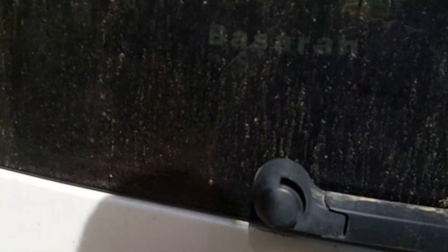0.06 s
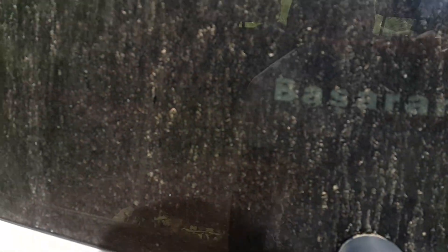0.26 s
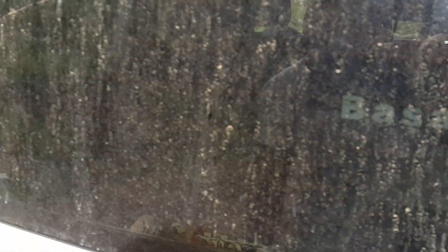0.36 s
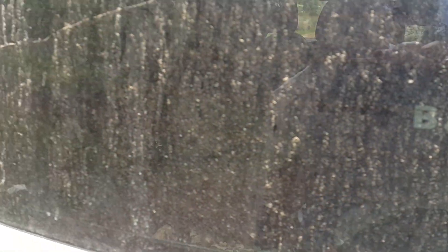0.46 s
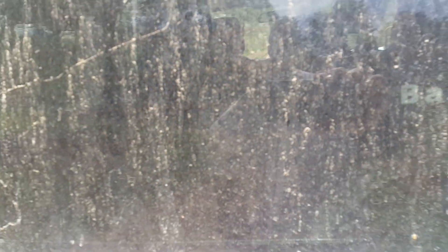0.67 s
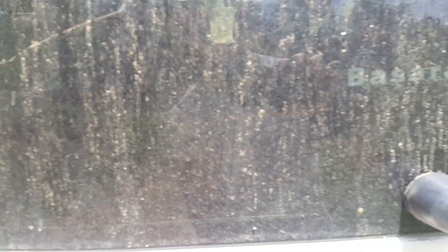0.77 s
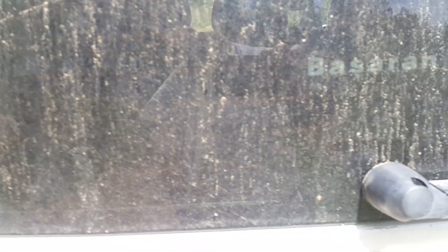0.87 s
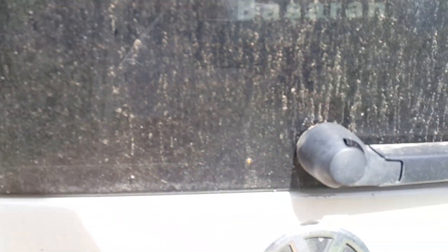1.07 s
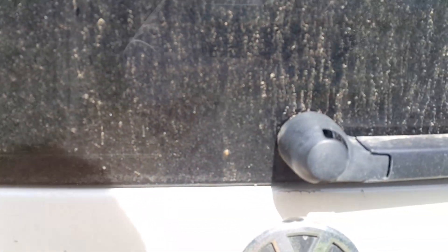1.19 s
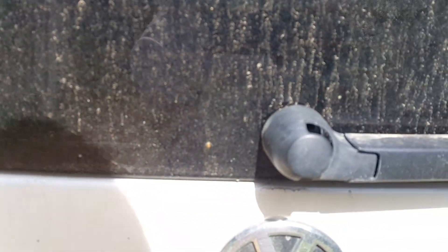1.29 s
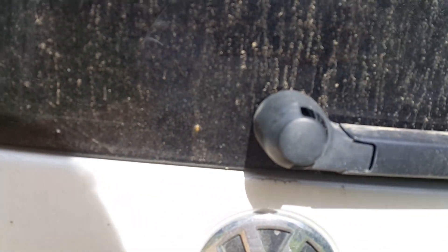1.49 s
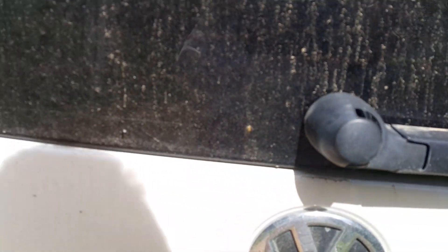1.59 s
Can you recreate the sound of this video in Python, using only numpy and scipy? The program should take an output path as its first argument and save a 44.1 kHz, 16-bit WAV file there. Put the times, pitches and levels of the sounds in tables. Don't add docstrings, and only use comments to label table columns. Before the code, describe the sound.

A van tailgate is pushed down outdoors, heard close up. A faint touch at 0.04 seconds, then a heavy hollow thud with rapid bounces and trim rattle from 0.23 to 0.45. A lighter knock and dry hand rub follow around 0.6-0.75, wind thumps at 0.9-1.05, a scraping metallic latch snap at 1.3, then rubber creaks, a soft rub and tiny distant bird whistles over faint traffic.

```python
import sys
import numpy as np
from scipy import signal
from scipy.fft import rfft, irfft
from scipy.io import wavfile
from scipy.ndimage import uniform_filter1d

SR = 44100
rng = np.random.default_rng(int(sys.argv[2]) if len(sys.argv) > 2 else 0)


def dump(signal):
    limited = np.clip(np.atleast_2d(signal).T, -1, 1)
    pcm = np.round(limited * 32767).astype(np.int16)
    wavfile.write(sys.argv[1], SR, pcm)


def undo_db(level):
    steps = np.asarray(level, float) / 20
    return 10 ** steps


N = 72765

# (frequency [Hz], level [dB])
RIGHT_FACING = [(300, -2), (1000, 2), (2400, 2), (5500, 7), (9000, -5)]
CLIP_RIGHT_DB = 7.5


def evened(x):
    return x / np.sqrt(np.mean(x ** 2) + 1e-20)


def read(points, hz):
    f, value = np.transpose(points)
    return np.interp(np.log(hz + 1), np.log(f + 1), value)


def colour(x, points):
    gain = undo_db(read(points, np.fft.rfftfreq(x.shape[-1], 1 / SR)))
    return irfft(rfft(x) * gain, x.shape[-1])


def add(mix, s, sound):
    part = mix[..., max(round(s * SR), 0):][..., :sound.shape[-1]]
    part += sound[..., :part.shape[-1]]


def ring(x, modes):
    out = np.zeros(x.shape)
    for k, (hz, width_hz, db) in enumerate(modes):
        r = np.exp(-np.pi * width_hz / SR)
        poles = [1, -2 * r * np.cos(2 * np.pi * hz / SR), r * r]
        out += (-1) ** k * undo_db(db) * signal.lfilter([1 - r, 0, r - 1], poles, x)
    return out


def street():
    # (frequency [Hz], density [dB per Hz])
    wash_spectrum = [(24, 10.5), (40, 21), (237, 5.5), (715, 4), (852, 0), (3800, -13), (5400, -12.5),
                     (7500, -18), (16000, -16.5)]
    # (frequency [Hz], likeness [0-1])
    likeness = [(100, 1), (500, 0.61), (1500, 0)]
    level_db, patch_db = -54.5, 2
    frames, hz = N // 128 + 5, np.fft.rfftfreq(512, 1 / SR)
    a, b, c, d, patches = rng.standard_normal((frames, 257, 5)).T
    patches = uniform_filter1d(patches, 8, 0)
    patches = evened(uniform_filter1d(patches, 20, 1))
    same = np.clip(read(likeness, hz), -1, 1)[:, None]
    left = a + 1j * b
    right = same * left + np.sqrt(1 - same ** 2) * (c + 1j * d)
    z = np.array([left, right]) * undo_db(read(wash_spectrum, hz)[:, None] + patch_db * patches)
    wash = signal.istft(z, nperseg=512, noverlap=384)[1][:, :N]
    return undo_db(level_db) * evened(np.array([wash[0], colour(wash[1], RIGHT_FACING)]))


def bird():
    # (time [s], length [s], level [dB], pitch [Hz], left over right [dB])
    whistles = [
        (1.363, .055, -65, 4400, -14),
        (1.585, .05, -65, 4480, 6),
    ]
    out = np.zeros((2, N))
    for s, length_s, db, hz, pan_db in whistles:
        t = np.arange(0, length_s, 1 / SR)
        pitch_hz = hz * (1 - 0.123 * np.exp(-t / 0.0049) - 0.14 * t)
        tone = np.sin(2 * np.pi * np.cumsum(pitch_hz) / SR) * np.sin(np.pi * t / length_s) ** .5
        add(out, s, undo_db(db + pan_db * np.array([[.5], [-.5]])) * tone)
    return out


def wind():
    # (time [s], level [dB])
    gust = [(0, -46), (.08, -32), (.17, -30), (.25, -52), (.55, -49), (.8, -56), (.9, -25.5), (.95, -24.5),
            (.98, -35.5), (1.02, -30), (1.17, -39.5), (1.22, -45), (1.35, -52.5), (1.52, -59), (1.65, -59)]
    # (time [s], level [dB], frequency [Hz], negative = inverted)
    thumps = [(0.145, -22, 190), (0.151, -20.5, 149), (0.868, -24, 118), (0.902, -17.5, 121),
              (0.937, -28, 125.5), (0.998, -23.5, 293), (1.008, -18.5, 160), (1.023, -26, 257),
              (1.032, -23, 205.5), (1.038, -14, -230), (1.049, -20.5, 120), (1.141, -23, 156)]
    # (frequency [Hz], density [dB per Hz])
    turbulence = [(25, -36), (55, 10.5), (100, 18), (200, 4), (350, -6), (700, -47)]
    left_db, lump_db, thump_turns = -56, 3, 0.39
    t = np.arange(N) / SR
    lumps = undo_db(lump_db * evened(uniform_filter1d(rng.standard_normal((2, N)), 700)))
    out = evened(colour(rng.standard_normal((2, N)) * lumps, turbulence))
    out *= undo_db([left_db + 6 * np.exp(-t / 0.69), np.interp(t, *np.transpose(gust))])
    for s, db, hz in thumps:
        turns = np.arange(-1000, 1000) / SR * hz
        thump = np.sin(2 * np.pi * turns) * np.exp(-(turns / thump_turns) ** 2)
        add(out[1], s - 1000 / SR, undo_db(db + 4.5) * thump)
    return out


def seal_creep():
    # (time [s], resonance [Hz], level [dB])
    creep_path = [(1.35, 1256, -65), (1.375, 1370, -65.5), (1.41, 1430, -66.5), (1.43, 1300, -66),
                  (1.445, 1330, -57), (1.49, 1490, -53.5), (1.526, 1420, -58.5), (1.566, 1400, -52),
                  (1.612, 1480, -62.5), (1.65, 1500, -62)]
    width_hz, slips_per_s, size_db = 290, 3500, 1
    s, hz, db = np.transpose(creep_path)
    t = np.arange(N) / SR
    sizes = undo_db(size_db * np.minimum(rng.exponential(1, N), 4))
    slips = sizes * (rng.random(N) < slips_per_s / SR)
    clicks = slips * rng.standard_normal(N) + 0.11 * rng.standard_normal((2, N))
    turn = np.exp(2j * np.pi * np.cumsum(np.interp(t, s, hz)) / SR)
    r = np.exp(-np.pi * width_hz / SR)
    rung = (turn * signal.lfilter([1], [1, -2 * r, r * r], clicks / turn)).real
    return evened(rung) * undo_db(np.interp(t, s, db, left=-120) + CLIP_RIGHT_DB * np.array([[-.5], [.5]]))


def rubs():
    # (time [s], length [s], hiss level [dB], rumble over hiss [dB])
    strokes = [
        (0.1977, 0.21, -48.5, 18),
        (0.41, 0.23, -84.5, 41.5),
        (0.642, 0.14, -48, -4.5),
        (0.061, 0.056, -53, 11),
        (1.4726, 0.18, -48.5, 6),
    ]
    # (frequency [Hz], density [dB per Hz])
    skin_hiss = [(290, -45), (500, -6), (1100, -3), (3800, -12.5), (5300, -11.5), (7500, -30), (11000, -23),
                 (16000, -37)]
    rumble_hz, grain_db = 300, 2.5
    hiss = rng.standard_normal((2, N)) + 0.13 * rng.standard_normal(N)
    hiss = evened(colour(hiss, [(200, 4.1)] + list(skin_hiss)))
    rumble = rng.standard_normal(N) + 0.18 * rng.standard_normal((2, N))
    rumble = ring(rumble, [(rumble_hz, 160, 0), (150, 110, -1)])
    rumble = evened(colour(rumble, [(900, 0), (2500, -25)]))
    clumps = undo_db(grain_db * evened(uniform_filter1d(rng.standard_normal(N), 150)))
    hiss_gain, rumble_gain = np.zeros((2, N))
    for s, length_s, db, rumble_db in strokes:
        arch = np.sin(np.pi * np.arange(0, 1, 1 / (length_s * SR)) ** 0.8)
        add(hiss_gain, s, undo_db(db) * arch)
        add(rumble_gain, s, undo_db(db + rumble_db) * arch)
    return clumps * (hiss_gain * hiss * undo_db([[-1.5], [1.5]]) + rumble_gain * rumble)


def clip_ticks():
    # (time [s], level [dB], pitch [Hz], time to fall 85 dB [s])
    clip_hits = [(.2555, -8.5, 1767, 0.033), (.2572, -6, 1130, 0.012), (.3145, -14.5, 1857, 0.038),
                 (.335, -24.5, 1020, 0.036), (.343, -17, 1570, .03), (.396, -24.5, 1116, 0.045),
                 (.411, -33, 890, 0.055), (.429, -31.5, 946, 0.056), (.439, -38, 1490, 0.027),
                 (.459, -33.5, 1140, 0.066), (.466, -38, 1280, 0.052), (.476, -39, 2000, .025),
                 (.486, -38, 1050, 0.037), (.499, -38, 1150, 0.026), (.536, -35, 1040, 0.046),
                 (.547, -41, 1000, 0.044), (.561, -38.5, 1110, 0.053), (.588, -45, 1060, .04),
                 (.609, -33.5, 1024, 0.14), (0.649, -34.5, 303, 0.31), (0.675, -29, 1600, 0.038),
                 (.711, -42, 664, 0.077), (1.007, -38, 1610, 0.035), (1.209, -46, 1320, 0.021),
                 (1.259, -41, 1080, 0.036), (1.307, -33, 710, 0.032), (1.3508, -28, 496, 0.013),
                 (1.374, -53, 450, .02), (1.473, -42, 1370, 0.036), (1.5, -28, 1380, 0.025),
                 (1.538, -43, 920, 0.044), (1.589, -39, 790, 0.051)]
    rise_s, spread, rough_db, left_lag_s = 0.0008, 0.21, 2, 0.00026
    out, t = np.zeros((2, N)), np.arange(3000) / SR
    draws = rng.uniform(-1.08, 1, (len(clip_hits), 2, 2, 1))
    for (s, db, hz, t60), (apart, turn) in zip(clip_hits, draws):
        near_hz = hz * (1 + spread * (apart + [[-1], [1.5]]) / 2)
        near = np.sin(2 * np.pi * near_hz * t + np.pi * turn).sum(0)
        shake = undo_db(rough_db * evened(uniform_filter1d(rng.standard_normal(len(t)), 60)))
        envelope = undo_db(db - 1.5 - 85 * t / t60) * np.minimum(t / rise_s, 1) * shake
        note = envelope * (np.sin(2 * np.pi * hz * t) + 0.59 * near)
        add(out[0], s + left_lag_s, undo_db(-CLIP_RIGHT_DB / 2) * note)
        add(out[1], s, undo_db(CLIP_RIGHT_DB / 2) * note)
    return out


def latch():
    # (time [s], level [dB])
    striker_slips = [(1.2908, -24), (1.2952, -22), (1.2978, -23), (1.3012, -24), (1.3034, -20),
                     (1.306, -21), (1.3085, -22), (1.3115, -31), (1.316, -38)]
    # (time [s], level [dB])
    claw_snaps = [
        (1.2968, -13),
        (1.308, -6.5),
    ]
    # (frequency [Hz], width [Hz], level [dB])
    latch_modes = [(2520, 210, -10), (3500, 390, -9.5), (5090, 730, -2.5), (6600, 1400, -5),
                   (10400, 1300, -13.5), (15000, 2900, -20)]
    # (frequency [Hz], level [dB])
    latch_gaps = [(900, -8), (1750, -11), (2300, 0), (3600, 0), (4050, -8), (4700, -1), (15800, 0),
                  (16800, -40)]
    # (frequency [Hz], level [dB])
    right_shade = [(2000, 0.5), (5500, -0.5), (8000, -9.5), (16000, -3.5)]
    grind_db, slip_t60_s, right_lag_s, right_db = 19, 0.011, 0.00066, 5
    spring_s, spring_hz, spring_db = 1.3135, 830, -31
    grind, snap, t = np.zeros(N), np.zeros(N), np.arange(900) / SR
    for s, db in striker_slips:
        envelope = undo_db(grind_db + db - 60 * t / slip_t60_s) * np.minimum(t / 0.00077, 1)
        add(grind, s, envelope * rng.standard_normal(len(t)))
    for s, db in claw_snaps:
        add(snap, s, undo_db(db) * np.diff(np.exp(-((t - .0002) / .00004) ** 2)))
    twice_rung = ring(ring(grind + 6.5 * snap, latch_modes), latch_modes)
    left = twice_rung + 1.02 * ring(grind, latch_modes)
    left = colour(left + 2 * snap, latch_gaps)
    envelope = undo_db(spring_db - 60 * t / .05) * np.sin(np.pi * t / t[-1]) ** .5
    add(left, spring_s, envelope * np.sin(2 * np.pi * spring_hz * t))
    right = colour(np.roll(left, round(right_lag_s * SR)), right_shade)
    return np.array([left, undo_db(right_db) * right])


def trim_knocks():
    # (time [s], level [dB], brightness [dB], t60 [s])
    trim_hits = [(0.037, -38, 3.5, 0.12), (0.2291, -13.5, 2.5, 0.04), (0.234, -22.5, 3.5, 0.13),
                 (.254, -16.5, 4.5, 0.13), (.2565, -9.5, 8, 0.011), (0.285, -28.5, 4.5, 0.072),
                 (0.304, -29.5, 8.5, 0.13), (0.314, -19, 6.5, 0.13), (.332, -24, 6, 0.19),
                 (0.342, -20, -5.5, 0.25), (.348, -30, 3, 0.05), (0.395, -26.5, 3, 0.047),
                 (0.409, -36.5, 3.5, 0.035), (0.604, -32, 5.5, 0.15), (0.674, -38.5, -6, 0.1),
                 (0.718, -45, 8.5, 0.042), (0.766, -59, 26.5, 0.029), (0.9, -44.5, 2, 0.092),
                 (1.007, -49, -0.5, 0.18), (1.03, -32, 5, 0.035), (1.043, -58, 25.5, 0.067),
                 (1.2559, -49, 13, 0.052), (1.265, -50.5, 13, 0.059), (1.351, -40, 0, 0.014),
                 (1.374, -47, 9, 0.015), (1.499, -50, 3, 0.025)]
    # (frequency [Hz], width [Hz], level [dB])
    trim_modes = [(510, 109, 3), (877, 176, 4), (1073, 276, 1.5), (1320, 214, 1), (1637, 340, -3.5),
                  (2320, 380, -4)]
    # (frequency [Hz], density [dB per Hz])
    edge_spectrum = [(1800, -15.5), (3000, -15), (4200, -22), (5400, -22), (6500, -29.5), (7500, -63)]
    # (frequency [Hz], density [dB per Hz])
    air_spectrum = [(6000, -60), (8000, -41), (12500, -44), (15500, -48), (16200, -80)]
    air_t60_s = .022
    (body, upper, edge, air), t = np.zeros((4, 2, N)), np.arange(8000) / SR
    for s, db, bright_db, t60 in trim_hits:
        a, b, c = rng.standard_normal((3, len(t)))
        burst = np.array([0.46 * a + 0.51 * b, 0.23 * a + 0.74 * c]) * np.minimum(t / 0.0003, 1)
        add(body, s, burst * undo_db(db - 60 * t / t60))
        add(upper, s, burst * undo_db(db + min(bright_db, 0) - 60 * t / t60))
        add(edge, s, burst * undo_db(db + bright_db - 75 * t / t60))
        add(air, s, burst * undo_db(db + 2.58 * min(bright_db, 12.5) - 60 * t / air_t60_s))
    mix = undo_db(14) * (ring(body, trim_modes[:4]) + ring(upper, trim_modes[4:]))
    mix += undo_db(13) * colour(edge, edge_spectrum) + undo_db(11) * colour(air, air_spectrum)
    return np.array([mix[0], colour(mix[1], RIGHT_FACING)]) * undo_db(-0.5)


def panel():
    # (time [s], force [dB], flex pitch [Hz])
    panel_blows = [(0.0407, -20, 291), (0.055, -25.5, 260), (0.234, -10.5, 350), (0.251, -24.5, 204),
                   (0.2616, -8.5, 269), (0.2687, -12, 157), (.277, -11, 260), (.286, -11.5, 208),
                   (.293, -10, 182), (0.3225, -7, 277), (0.3352, -9.5, 185), (.342, -10, 260),
                   (0.352, -15, 219), (0.366, -12, 276), (0.387, -21.5, 240), (0.399, -16.5, 260),
                   (0.414, -15.5, 234), (0.439, -24, 181), (0.6074, -16, 327), (0.628, -25.5, 285),
                   (0.641, -22, 293), (.900, -28, 320)]
    # (frequency [Hz], level [dB], t60 [s])
    panel_modes = [(41, 8, 0.15), (89.8, 3.5, 0.31), (126.5, 2, 0.25), (143, -18, 0.24), (188.5, 4.5, 0.34),
                   (260, 1, 0.15), (286, 2.5, 0.24), (400.3, 3, 0.088), (530, -1, 0.11)]
    flex_s, ring_db, spot_db, side_spread = 0.0019, -52, 6, 0.43
    out, t = np.zeros((2, N)), np.arange(SR // 2) / SR
    u = np.arange(-400, 400) / SR
    hz, db, t60 = np.transpose(panel_modes)[..., None]
    decay = undo_db(db - 60 * t / np.minimum(t60, 25 / hz))
    spots = rng.standard_normal((len(panel_blows), 2, len(panel_modes)))
    for (s, force_db, flex_hz), (spot, side) in zip(panel_blows, spots):
        flex = undo_db(force_db) * np.cos(2 * np.pi * flex_hz * u) * np.exp(-(u / flex_s) ** 2)
        share = undo_db(ring_db + spot_db * spot)
        tilt = side_spread * side * np.minimum(hz[:, 0] / 500, 1)
        modes = np.sin(2 * np.pi * hz * (1 + .035 * side[:, None]) * t) * decay
        both = np.array([share * (1 + tilt), share * (1 - tilt)]) @ modes
        add(out, s + u[0], signal.oaconvolve(both, flex[None], axes=1))
        add(out, s + u[0], np.array([flex, flex]))
    return out


def scene():
    slam_s, duck_db, recover_s = .23, -9, .4
    since = np.arange(N) / SR - slam_s
    duck = undo_db(duck_db * (since > 0) * np.exp(-(since / recover_s) ** 4))
    surroundings = duck * street() + bird() + wind()
    tailgate = seal_creep() + rubs() + clip_ticks() + latch() + trim_knocks() + panel()
    return surroundings + tailgate


def low_pass(x):
    return signal.sosfilt(signal.butter(12, 16820, fs=SR, output="sos"), x)


def record(dry):
    mic_low_hz = 39
    thin = signal.lfilter(*signal.butter(3, mic_low_hz, "high", fs=SR), dry)
    return low_pass(thin)


dry = scene()
out = record(dry)
dump(out)
```